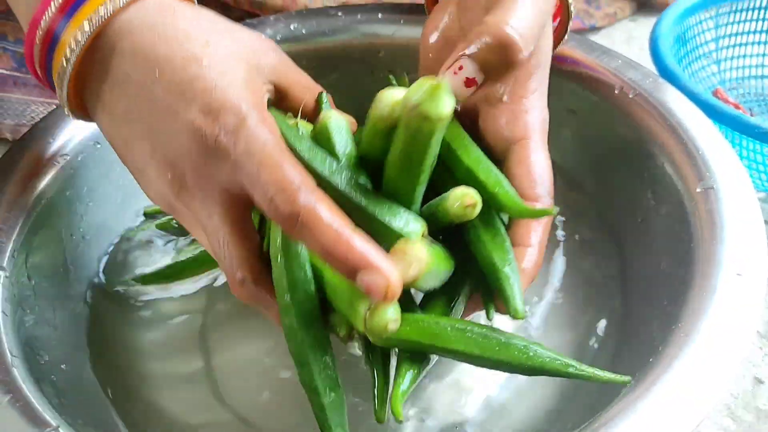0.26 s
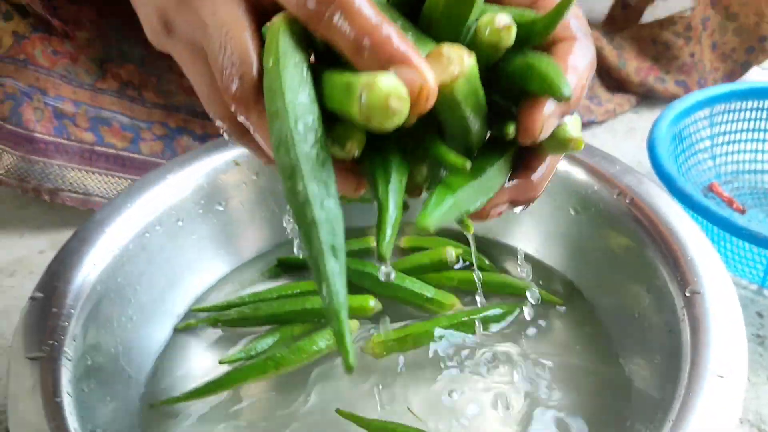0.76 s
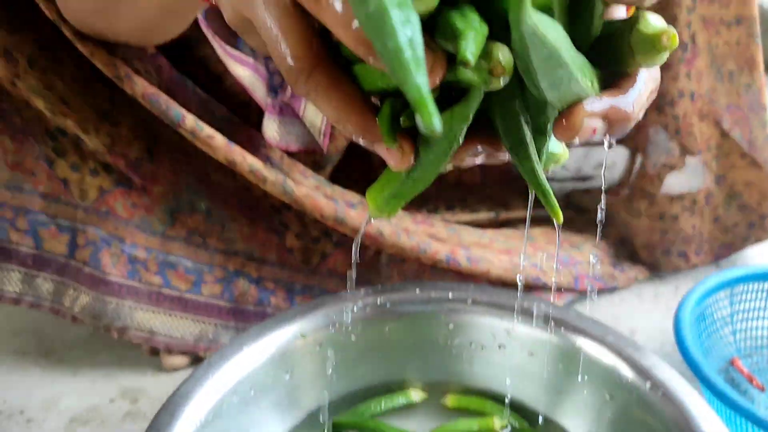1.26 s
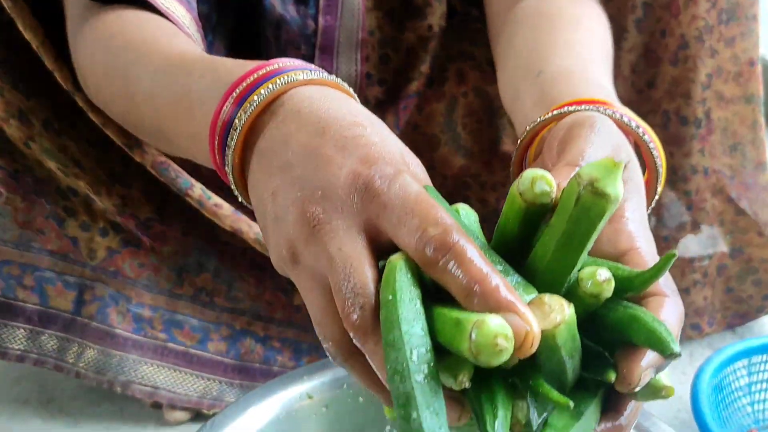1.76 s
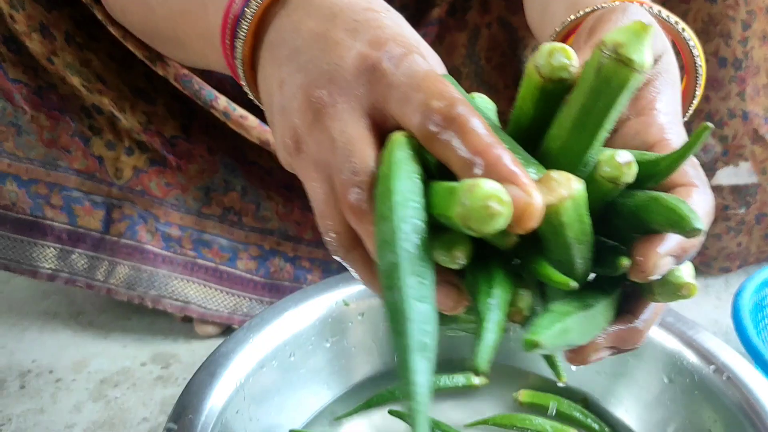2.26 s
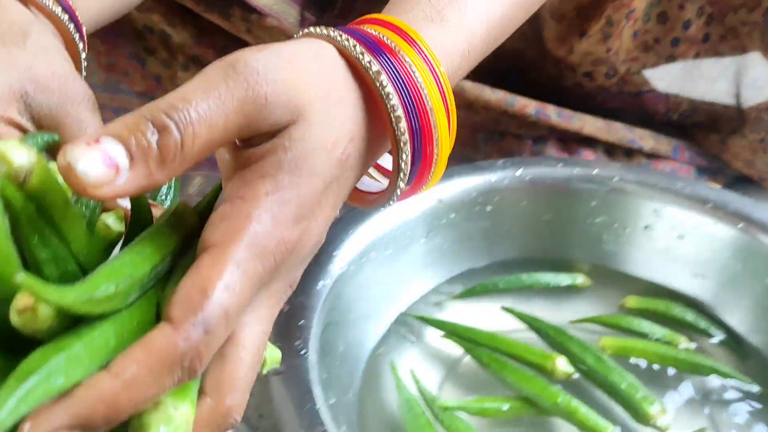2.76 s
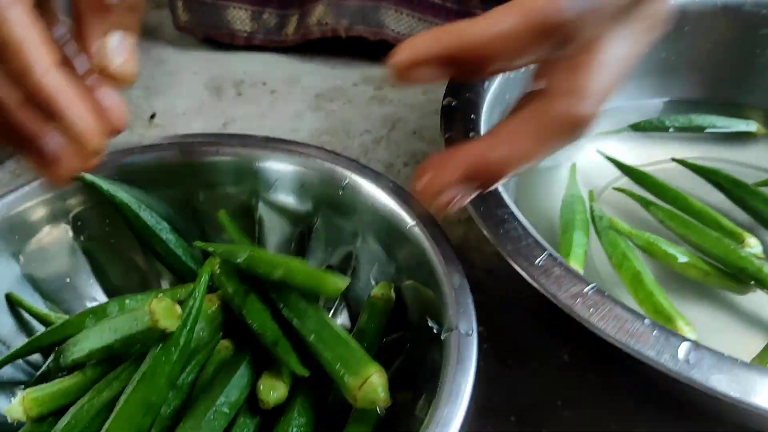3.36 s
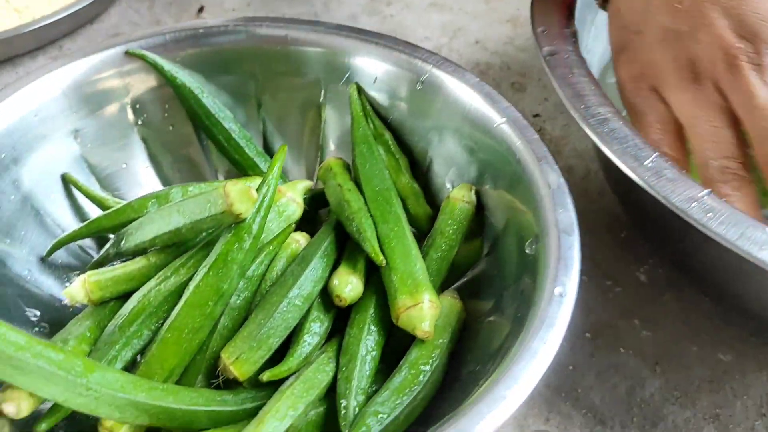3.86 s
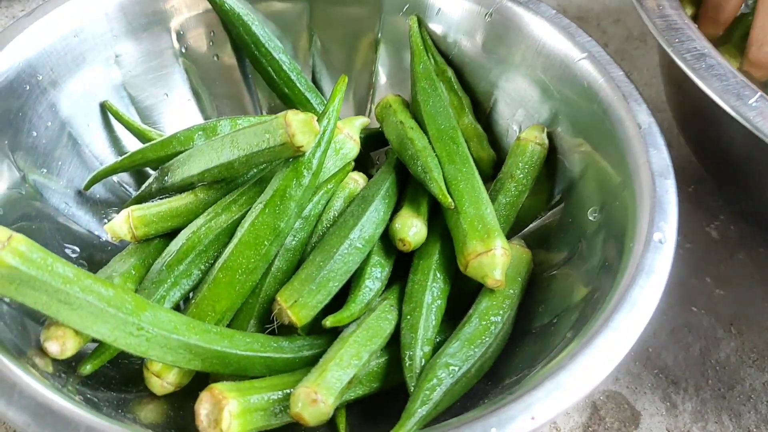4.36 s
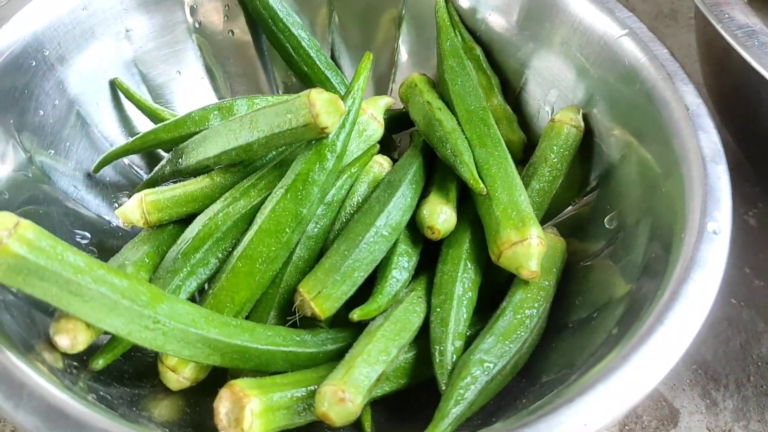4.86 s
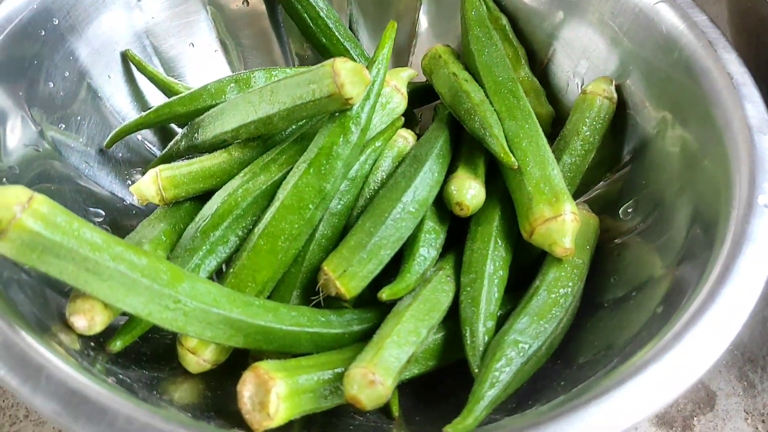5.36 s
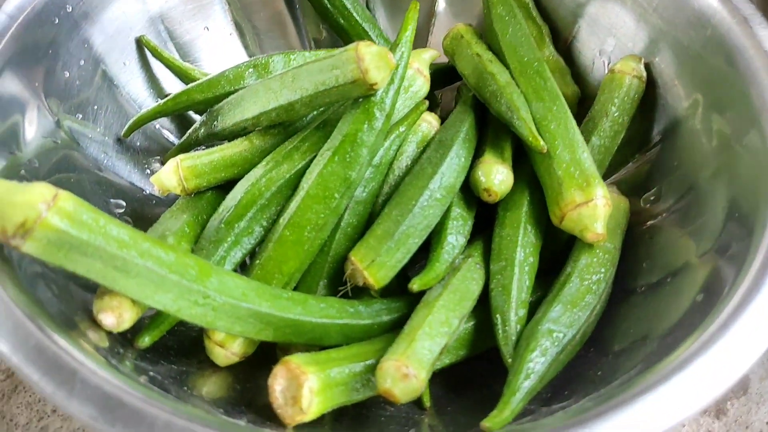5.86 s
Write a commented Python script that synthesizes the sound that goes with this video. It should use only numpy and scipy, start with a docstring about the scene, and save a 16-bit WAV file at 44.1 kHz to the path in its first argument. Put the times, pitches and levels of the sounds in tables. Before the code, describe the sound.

Wet hands lift pods from water: bright bangle ticks, dull bowl knocks, dripping and small rising bubble blips. Things thin out to faint yard noise. At about three seconds a hard, dense clatter of pods in a steel bowl dominates and settles within half a second. A dove then purrs and coos, stirred water trickles, bowl and bangles tinkle again, and wind thumps the left side. Heard very close, with short reflections outdoors.

```python
"""A yard, two microphone ports close to two steel bowls, with insects hissing and a yard wash behind throughout.
First wet hands in bangles work in the water bowl: knocks, clinks, drops, bubbles and slosh; far coos come early.
Near 2.7 s a dove coos closer; from 3 s pods crack and ring in the dry bowl, tumble and settle; more coos follow.
From 4 s puffs of wind buffet the left port; near 4.7 s and 6 s the water bowl and bangles sound again.
Steel is dying modes, drops are noise snaps and rising sines, coos are warbled sines, wind is low noise."""
import sys
import numpy as np
from scipy import signal
from scipy.fft import rfft, irfft, next_fast_len
from scipy.io import wavfile
from scipy.ndimage import uniform_filter1d

SR = 44100
rng = np.random.default_rng(int(sys.argv[2]) if len(sys.argv) > 2 else 0)


def file_out(sig):
    """Save sig as 16-bit WAV at sys.argv[1]."""
    # one column per channel
    cols = np.atleast_2d(sig).T
    # limit, then scale
    lim = np.clip(cols, -1, 1)
    pcm = np.round(lim * 32767).astype(np.int16)
    wavfile.write(sys.argv[1], SR, pcm)


N = 270326

# Pods landing in the dry bowl: start_s, level_db, favoured pitch_hz, fall_db per octave from it, choke_s after start
POD_BLOWS = [(3.015, -29.5, 261, 3, 0.015), (3.045, -14, 3770, 0.8, 0.039), (3.051, -22, 480, 45, 0.046),
             (3.061, -21, 1012, -2, 0.041), (3.055, -16, 745, 5.5, .07), (3.085, -16.5, 2780, -1, 0.022),
             (3.116, -22.5, 1350, 37, 0.026), (3.129, -28, 253, 13, 0.096), (3.159, -22, 470, 7.5, 0.024),
             (3.188, -27, 1200, 36, 0.067), (3.199, -30.5, 253, 4.5, 0.098), (3.254, -24.5, 253, 7, 0.077),
             (3.26, -42, 1071, 43, .6), (3.271, -33, 2950, 8, 0.027), (3.319, -32, 700, 11, .3),
             (3.397, -24.5, 1238, 25, .4), (3.399, -30, 400, 7, 0.056)]
# Pods tumbling and settling: time_s, level_db
POD_TUMBLE = [(3.0, -74), (3.018, -27.5), (3.036, -28.5), (3.048, -15), (3.112, -25), (3.226, -27.5),
              (3.254, -28), (3.33, -36.5), (3.44, -43.5), (3.52, -67)]
# Relative colour of the dense sheet-steel ring: pitch_hz, level_db
SHEET_STEEL = [(59, -40), (100, -25), (214, -6), (248, -9), (403, -21.5), (477, -8.5), (654, -8),
               (743, -12.5), (825, -7.5), (1040, -15), (1520, -11), (2810, 4.5), (4020, -8), (6400, -8.5),
               (7570, 0.5), (9500, -19), (15500, -29)]
# Modes of the dry bowl: pitch_hz, light_db, heavy_db under the pods, t60_s before the load stretches it
DRY_BOWL_MODES = [(259, -15.5, -12, 0.23), (480, -11.5, -32.5, 0.04), (700, -32.5, -15.5, 0.86),
                  (745, -9.5, -22.5, 0.27), (921, -37, -22, 0.3), (1018.5, -7.5, -33, .5),
                  (1071, -38, -7, 0.38), (1197, -12, -29.5, .6), (1238, -33.5, -5, 0.15),
                  (1460, -29, -14, 0.17), (1635, -31, -11.5, 0.19), (1828, -9, -29.5, 0.1),
                  (2000, -13.5, -11.5, 0.08), (2200, -15.5, -14.5, 0.45), (2217, -15.5, -17, 0.3),
                  (2300, -23, -36, 0.92), (2310, -15, -22.5, 0.22), (2700, -16.5, -31, 0.34),
                  (2934, -15.5, -17.5, 0.97), (3300, -12, -22.5, 0.11), (3520, 2, -21.5, 0.085),
                  (3800, -5, -6.5, 0.072), (3820, -8.5, -28, 0.09), (4330, -16, -27.5, 0.12),
                  (4740, -19.5, -28.5, 0.18), (5190, -20.5, -38.5, .2), (6100, -22.5, -42, 0.11),
                  (7496, -7.5, -36.5, .08), (8170, -8.5, -31.5, .08), (7200, -6, -38, 0.063)]
# The dry bowl at the two ports: pitch_hz, left_minus_right_db
DRY_BOWL_LEAN = [(60, 2), (110, -0.5), (200, 6.5), (380, 5), (700, 3), (1290, -4.5), (2380, 2.5),
                 (4400, -0.5), (8120, -10), (15000, -7.5)]
FILL_FROM_S, FILL_S = 3.06, 0.2  # the load in the bowl grows from nothing to full
RING_LIGHT, RING_FULL = .9, 1.6  # ring time as a factor, bowl empty and full
# Softer tumbling has more bass: dB of lift per dB below the hardest, up to a limit
HARDEST_DB, DULLING, DULLEST_DB = -17.5, 0.87, 22

# Knocks on the water bowl: start_s, level_db, favoured pitch_hz, fall_db per octave from it
BOWL_KNOCKS = [(.009, -49, 243, 17), (.116, -53.5, 1370, 2), (.134, -50, 3200, 11), (0.149, -64, 920, 35),
               (.339, -57.5, 2820, 14), (0.611, -52, 240, 33), (.664, -46, 921, 2.5),
               (0.666, -53, 1599, 12), (.68, -46.5, 296, 31), (2.465, -53, 240, 8), (4.664, -30, 1599, 43),
               (4.665, -39.5, 3510, 5.5), (4.721, -35.5, 2024, 35), (4.722, -41, 860, -15),
               (5.816, -51, 1294, 16.5), (6.004, -49.5, 1061, 32), (6.05, -55.5, 2299, 9)]
# Modes of the water bowl: pitch_hz, level_db, t60_s
WATER_BOWL_MODES = [(240, -2.5, 0.13), (296, -13.5, 2.5), (623, -2, 0.34), (920, -1.5, 0.35),
                    (1061, -4, 0.2), (1294, -11, 0.6), (1599, -0.5, 0.17), (2024, -3, 0.44),
                    (2299, -3, 0.41), (2476, -8, 0.19), (2820, -10, 0.35), (3200, -22, 0.16),
                    (3800, -15, 0.13), (3510, -12.5, 0.12)]
# A knock that singles out one mode thuds less: THUD_LOSS is dB per dB of fall-off
THUD_DB, THUD_LOSS, KNOCK_PAN_DB = -5, 0.33, 7.5

# Bangles clinking: start_s, level_db before panning, loudest pitch_hz, fall_db per octave from it
BANGLE_CLINKS = [(0.1171, -27.5, 4657, 4.5), (0.1295, -26.5, 7120, 20), (.1925, -36, 4900, 3),
                 (.2947, -47.5, 4540, 25), (.3351, -43, 7360, 19), (.5631, -45, 4440, 14),
                 (0.707, -47.5, 7300, 14), (4.666, -28, 6100, 10), (4.7192, -27.5, 4720, 3),
                 (4.7661, -38, 5850, 30), (6.0479, -33.5, 6260, 10)]
BANGLE_LOW_HZ, BANGLE_HIGH_HZ = 4300, 13000  # span of the many ring pitches
CLINK_T60_S = 0.058  # scaled afresh for each ring

# The microphone turns from the water bowl to the dry one: time_s, left_minus_right_db of the water bowl's treble
MICROPHONE_TURN = [(0, -3.5), (3.6, -5), (4.2, 8.5), (6.13, 9)]

# Drops bursting on water and steel: start_s, peak_db before panning, centre_hz, width as a fraction of the centre
DROP_SNAPS = [(0.245, -38, 9200, 0.21), (0.6669, -36, 6450, 0.43), (.7811, -43, 9200, .97),
              (0.987, -44, 7200, 0.13), (1.0485, -39, 7300, 0.39), (1.1655, -39, 7740, 0.17),
              (1.2116, -37.5, 9400, 0.45), (1.2337, -26.5, 4950, 1), (1.3038, -30.5, 7470, 0.21),
              (1.3202, -35, 7650, 0.24), (1.331, -36.5, 7200, 0.62), (1.3785, -35, 9500, 0.61),
              (1.415, -46, 7900, 0.44), (1.4224, -44, 7800, .6), (1.544, -36.5, 7850, .38),
              (1.5784, -35, 7340, .2), (1.659, -40.5, 8550, 0.25), (1.714, -37.5, 8150, 0.11),
              (1.779, -41, 7850, 0.3), (1.7858, -37.5, 7800, 1), (1.8208, -28.5, 7230, 0.21),
              (1.824, -33.5, 7850, .95), (2.359, -45.5, 7260, 0.11), (2.424, -53.5, 5400, 0.17),
              (3.5607, -43, 7440, 0.25), (3.631, -43.5, 2700, 0.65), (3.6335, -38, 6930, 0.3),
              (3.7304, -46.5, 8000, 0.72), (3.7672, -39, 8020, 0.2), (3.8071, -43, 6000, 0.36),
              (4.0911, -36.5, 7680, 0.14), (4.152, -49.5, 3500, 1), (4.1744, -39, 9030, .39),
              (4.21, -49, 1790, 0.91), (4.265, -45, 3810, 0.47), (5.0417, -44.5, 7240, .8),
              (5.0558, -43.5, 8170, .2), (5.5613, -41, 5700, .37), (5.778, -64, 4700, .3),
              (5.816, -45.5, 6000, .95), (5.9, -56, 8450, 0.23), (5.989, -40, 8100, .67),
              (6.0021, -37, 8600, .31), (6.0198, -36, 8000, 0.93)]
# Bubbles caught under drops: start_s, level_db before panning, starting pitch_hz, t60_s
DROP_BUBBLES = [(0.12, -28.5, 1390, .017), (.25, -55.5, 888, 0.44), (0.288, -45, 1022, 0.094),
                (.306, -38.5, 1218, 0.13), (0.37, -53, 1000, .058), (0.583, -50, 1015, 0.052),
                (.756, -42.5, 1295, 0.19), (.781, -35.5, 1615, 0.055), (0.82, -43, 2340, 0.054),
                (1.179, -47.5, 961, 0.38), (1.207, -42.5, 1099, 0.089), (1.223, -43.5, 1326, 0.083),
                (1.243, -43, 1320, 0.058), (1.264, -41, 1520, 0.043), (1.35, -47, 1950, 0.057),
                (1.358, -39.5, 1560, 0.063), (1.372, -41, 1590, 0.025), (1.422, -36.5, 1087, 0.052),
                (1.434, -35.5, 1128, .036), (1.454, -44, 998, 0.054), (1.461, -52, 967, 0.11),
                (1.465, -50, 2310, 0.047), (1.618, -51, 3000, 0.031), (1.787, -32, 1373, 0.042),
                (1.82, -28, 1473, 0.031), (1.832, -40, 1420, .036), (1.996, -56.5, 2020, .037),
                (4.604, -55, 1025, 0.068), (5.99, -51.5, 3150, 0.06), (6.006, -38, 2060, .03),
                (6.023, -34, 1920, 0.027)]
SNAP_T60_S = .015
RISE_OCT_PER_S, BUBBLE_PAN_DB = 4.39, 7
# Stray small bubbles; the level is that of the largest, above the slosh
GURGLES_PER_S, GURGLE_DB, GURGLE_T60_S = 45, 4, 0.08
GURGLE_LOW_HZ, GURGLE_HIGH_HZ = 817, 2607

# Spray and slosh round the working hands, two stretches, each of: time_s, level_db
SLOSH_STRETCHES = [
    [(0, -54.5), (.21, -55), (.4, -67.5), (.77, -57.5), (.97, -71), (1.39, -57.5), (1.57, -79), (1.8, -62),
     (2.05, -80)],
    [(3.5, -82), (3.55, -54), (3.86, -68), (4.14, -68), (4.3, -67), (4.75, -67.5), (5.18, -65), (5.67, -91),
     (5.83, -66), (5.96, -65), (6.13, -54.5)],
]
# Relative colour of the spray: pitch_hz, level_db
SPRAY_COLOUR = [(410, -71), (700, 2), (1100, 3), (1220, -12.5), (1580, -5), (3150, -9.5), (5950, -22),
                (6770, -49), (7710, -5), (10500, -37), (15500, -52.5)]

# Cooed notes, the first three from a farther bird: start_s, length_s before release, level_db before the mix,
# fade_db over the length, pitch_hz, drift_hz per second, warble_semitones before shaping, mean rolls_per_s
COO_NOTES = [(0.277, 0.1, -63, 10, 597, 303, 0.29, 20), (0.432, 0.086, -52, 2, 754, -120, 0.41, 18),
             (0.558, 0.32, -54.5, -6.5, 671.6, -25, 0.73, 16.5),
             (2.678, 0.049, -49, 11.5, 505, 195, .9, 27), (2.76, 0.085, -47, -10, 529.6, -48, 1, 33),
             (3.522, 0.13, -40, 2, 553.7, -35, 1.3, 30), (3.672, 0.15, -38.5, 0, 649, -26.5, 2.35, 28.3),
             (3.797, 0.012, -31, 0, 630, -24, 0.39, 19.5), (3.865, 0.0092, -29, -1.5, 634, -40, 1.7, 36),
             (3.921, 0.015, -29.5, -1, 624, -28, 1.14, 26.5),
             (3.976, 0.3, -38, -4.5, 624.5, -97, 2.26, 24.3), (4.308, 0.1, -42, -21, 590, -200, 0.83, 25.6),
             (4.574, 0.092, -58.5, 22.5, 495, 452, 1.5, 31.4),
             (4.704, 0.22, -37, -1, 642.4, 30.5, 2.34, 27.8),
             (4.938, 0.35, -37, -3.5, 661.7, -130, 1.17, 19.5)]
COO_ATTACK_S, COO_RELEASE_S, DOVE_PAN_DB = 0.005, 0.038, 8
SCOOP_SEMITONES, SCOOP_S, FLUTTER_DB = -.5, .025, 1.64

# Deep buffeting of the breeze: time_s, level_db before panning
BREEZE_LEVEL = [(0, -76.5), (3.9, -74), (4.5, -63), (5.3, -66.5), (5.55, -70.5), (6.13, -59.5)]
# Puffs on the left port: centre_s, level_db, length_s
WIND_PUFFS = [(4.04, -56, 0.051), (4.373, -63, 0.046), (4.46, -53.5, 0.056), (4.597, -52, 0.05),
              (4.734, -43, 0.18), (4.985, -44, 0.065), (5.044, -52, 0.055), (5.21, -43, 0.069),
              (5.315, -46.5, .07), (5.416, -51, 0.082), (5.685, -40.5, 0.045), (5.841, -35, 0.059),
              (5.96, -55, 0.088), (6.051, -32, 0.046)]
# The edge is noise above the deep buffeting; shelter is the level of the puffs at the right port
BREEZE_PAN_DB, BREEZE_EDGE_DB, PUFF_SHELTER_DB, PUFF_EDGE_DB = 10.5, 3.5, -48, -10

# Relative colour of the yard's wash: pitch_hz, level_db
YARD_COLOUR = [(20, -3.5), (47, -12.5), (112, -4), (207, -6.5), (250, -1.5), (324, -12), (416, -12),
               (597, -11.5), (789, -16), (1500, -25.5), (4800, -31.5), (6500, -30), (7600, -17),
               (9300, -35.5), (10300, -42), (15600, -58)]
# Left-right likeness of the yard: pitch_hz, likeness (1 is identical)
YARD_LIKENESS = [(60, 1), (180, 1), (550, 0.26), (1650, -0.09), (4970, -0.081), (15000, 0.76)]
# Lean of the yard: pitch_hz, left_minus_right_db
YARD_LEAN = [(60, -0.5), (180, 5), (550, 4.5), (1650, 4.5), (4970, -0.5), (15000, -10)]
YARD_DB, INSECT_DB = -59, -72  # insects before their throb

# The microphone ports lose the top: pitch_hz, level_db
PORT_COLOUR = [(20, 0), (9300, 2), (9900, -6.5), (15600, -13)]
CEILING = .85  # the loudest peaks round off towards this
EDGE_HZ = 15650  # band limit


def dry_bowl():
    """Single blows crack, then ring the modes until choked; the tumbling heap rattles the whole sheet."""
    out = np.zeros((2, N))
    mode_hz, light_db, heavy_db, t60 = np.transpose(DRY_BOWL_MODES)
    for s, db, hz, fall_db, choke_s in POD_BLOWS:
        t = np.arange(round((choke_s + .08) * SR)) / SR
        loaded = np.clip((s - FILL_FROM_S) / FILL_S, 0, 1)
        mode_db = light_db + loaded * (heavy_db - light_db)
        mode_t60 = t60 * (RING_LIGHT + loaded * (RING_FULL - RING_LIGHT))
        modes = np.c_[mode_hz, mode_db, mode_t60]
        sound = ring(modes, -fall_db * abs(octaves(modes, hz)), 0.000512, 22, len(t) / SR)
        crack = evened(coloured(rng.standard_normal((2, 3000)), SHEET_STEEL))
        crack = crack * amp(-60 * t[:3000] / 0.027)
        add(sound, 0, amp(-6 - 0.3 * fall_db) * crack)  # the less one pitch is favoured, the louder the crack
        choke = amp(-900 * np.maximum(t - choke_s, 0))
        add(out, s, amp(db) * choke * sound)
    gate, level_db = follow(POD_TUMBLE)
    rattle = patter(450, 3.4, SHEET_STEEL, .08, 4.5, count=12)(gate * amp(level_db))
    bass = signal.sosfilt(signal.butter(2, 1100, fs=SR, output="sos"), rattle)
    bass_db = np.minimum(DULLING * (HARDEST_DB - level_db), DULLEST_DB)
    out += rattle + (amp(bass_db) - 1) * bass
    leans = [np.multiply(DRY_BOWL_LEAN, [1, half]) for half in (.5, -.5)]
    out = np.array([coloured(port, lean) for port, lean in zip(out, leans)])
    too_deep = signal.butter(2, 110, "high", fs=SR, output="sos")  # too small to radiate deep bass
    return signal.sosfilt(too_deep, out)


def water_bowl():
    """Knuckles and pods knock the wall: a dull thud of noise, then the modes nearest the favoured pitch."""
    out, t = np.zeros((2, N)), np.arange(SR // 5) / SR
    for s, db, hz, fall_db in BOWL_KNOCKS:
        weight_db = -fall_db * abs(octaves(WATER_BOWL_MODES, hz))
        sound = ring(WATER_BOWL_MODES, weight_db, 0.00033, 23, 1.2 if hz < 320 else .5)
        thud = evened(resonate(rng.standard_normal((2, len(t))), hz, 0.43 * hz + 300))
        add(sound, 0, thud * amp(THUD_DB - THUD_LOSS * fall_db - 60 * t / 0.17))
        add(out, s, amp(db) * sides(KNOCK_PAN_DB)[:, None] * sound)
    return out


def bangles():
    """A stack of thin rings: one pitch stands out of a crowd that is new at every clink."""
    out = np.zeros((2, N))
    for s, db, hz, fall_db in BANGLE_CLINKS:
        where, size, lasting = rng.random((3, 80))
        crowd_hz = BANGLE_LOW_HZ * (BANGLE_HIGH_HZ / BANGLE_LOW_HZ) ** where
        crowd = np.c_[crowd_hz, -12 * size, CLINK_T60_S * (.4 + 1.3 * lasting)]
        modes = np.vstack([crowd, (hz, 4, 0.97 * CLINK_T60_S)])
        sound = ring(modes, -fall_db * abs(octaves(modes, hz)), 0.000633, 260, 0.25)
        add(out, s, amp(db) * facing(s) * sound)
    return out


def drops():
    """A burst is a snap of noise in a band; a bubble is a wobbling sine that at first rises as it dies."""
    out, t = np.zeros((2, N)), np.arange(SR // 5) / SR
    for s, db, hz, width in DROP_SNAPS:
        snap = rng.standard_normal((2, 2000)) * amp(-60 * t[:2000] / SNAP_T60_S)
        snap = snap + 0.091 * snap[::-1]  # a little of each port in the other
        snap = resonate(resonate(snap, hz, hz * width), hz, hz * width)
        add(out, s, amp(db) * facing(s) * snap / abs(snap).max())
    for s, db, hz, t60 in [*DROP_BUBBLES, *gurgles()]:
        wobble = evened(uniform_filter1d(rng.standard_normal(len(t)), size=150))
        rise = RISE_OCT_PER_S * np.minimum(t, .05)
        phase = 2 * np.pi * np.cumsum(hz * 2 ** (rise + 0.055 * wobble)) / SR
        body = amp(db - 60 * t / max(t60, .01)) * np.minimum(t / 0.0016, 1)
        ports = np.sin([phase, phase - 2 * np.pi * hz * 0.00031])  # right port lags
        add(out, s, sides(BUBBLE_PAN_DB)[:, None] * body * ports)
    return out


def gurgles():
    """Small bubbles at random times, louder where the water is stirred; rows as in DROP_BUBBLES."""
    when, high, size = rng.random((round(GURGLES_PER_S * N / SR), 3)).T
    s = when * (N - 1) / SR
    stirred = slosh_level()[(s * SR).astype(int)]
    db = 20 * np.log10(stirred + 1e-9) + GURGLE_DB - 12 * size
    hz = GURGLE_LOW_HZ * (GURGLE_HIGH_HZ / GURGLE_LOW_HZ) ** high
    return np.c_[s, db, hz, GURGLE_T60_S * np.ones(len(s))][db > -90]


def slosh():
    """Countless small drops, each a short fizz."""
    return patter(1200, 3.5, SPRAY_COLOUR, .04, 3.5)(slosh_level())


def slosh_level():
    """Gain of the stirred water at every sample."""
    return sum(gate * amp(db) for gate, db in map(follow, SLOSH_STRETCHES))


def dove():
    """Near sines that roll unevenly: each roll swells and its pitch climbs and falls."""
    out = np.zeros((1, N))
    wander = evened(uniform_filter1d(uniform_filter1d(rng.standard_normal(N), 1500), 1500))
    flutter = evened(uniform_filter1d(uniform_filter1d(rng.standard_normal(N), 500), 500))
    for s, length, db, fade_db, hz, drift, depth, per_s in COO_NOTES:
        t = np.arange(round((length + COO_RELEASE_S) * SR)) / SR
        uneven = 1 + 0.45 * np.roll(wander, -round(s * SR))[:len(t)]
        roll = 2 * np.pi * np.cumsum(per_s * uneven) / SR
        climb = np.tanh(0.86 * np.sin(roll)) - .3 * np.sin(2 * roll)  # a rounded, skewed warble
        semitones = depth * climb + SCOOP_SEMITONES * np.exp(-t / SCOOP_S)
        tone = np.sin(2 * np.pi * np.cumsum((hz + drift * t) * 2 ** (semitones / 12)) / SR)
        shape = np.clip(np.minimum(t / COO_ATTACK_S, (t[-1] - t) / COO_RELEASE_S), 0, 1)
        shape = shape * amp(db + fade_db * t / length)
        swell = 1 + 0.083 * depth * np.cos(roll + 0.59)
        add(out, s, (shape * tone * swell)[None])
    ports = [np.roll(out[0], 16), out[0]]  # the bird sits to one side
    return sides(DOVE_PAN_DB)[:, None] * amp(FLUTTER_DB * flutter) * ports


def wind():
    """Lumpy low turbulence, unrelated at the two ports; the puffs hardly reach the right one."""
    t = np.arange(N) / SR
    deep_colour = [(8, -35.0), (25, -0.5), (50, -1.5), (90, -24.0), (300, -75.5)]  # pitch_hz, level_db
    edge_colour = [(30, -41.5), (65, -0.5), (150, -13), (300, -17.0), (900, -69)]
    deep = evened(coloured(rng.standard_normal((2, N)), deep_colour))
    edge = evened(coloured(rng.standard_normal((2, N)), edge_colour))
    puffs = sum(amp(db) * np.exp(-(2 * (t - s) / length) ** 2) for s, db, length in WIND_PUFFS)
    breeze = amp(follow(BREEZE_LEVEL)[1]) * sides(BREEZE_PAN_DB)[:, None]
    breeze = breeze * (deep + amp(BREEZE_EDGE_DB) * edge)
    return breeze + puffs * amp([[0], [PUFF_SHELTER_DB]]) * (deep + amp(PUFF_EDGE_DB) * edge)


def yard():
    """Distant wash of noise with drifting patches, and a throbbing band of insects."""
    frames, hz = N // 256 + 5, np.fft.rfftfreq(1024, 1 / SR)
    a, b, c, d, patches = rng.standard_normal((frames, 513, 5)).T
    patches = evened(uniform_filter1d(uniform_filter1d(patches, 10, 0), 12, 1))
    same = np.clip(read(YARD_LIKENESS, hz), -1, 1)[:, None]
    left = a + 1j * b
    right = same * left + np.sqrt(1 - same ** 2) * (c + 1j * d)
    level = amp(read(YARD_COLOUR, hz)[:, None] + 0.88 * patches)
    spectra = np.array([left, right]) * level * sides(read(YARD_LEAN, hz))[:, :, None]
    wash = amp(YARD_DB) * evened(signal.istft(spectra, nperseg=1024, noverlap=768)[1][:, :N])
    throb = 1 + .6 * np.sin(2 * np.pi * (11 * np.arange(N) / SR + 0.17))  # 11 a second
    chirr = resonate(resonate(rng.standard_normal((2, N)), 7550, 470), 7550, 470)
    return wash + amp(INSECT_DB) * evened(chirr) * throb


def room(x, t60, count=SR // 2):
    """Reflections as sparse taps of random sign dying away, other taps at each port."""
    taps = np.zeros((2, count))
    at = np.arange(200, count - 20, 20) + rng.integers(0, 20, (2, (count - 201) // 20))
    np.put_along_axis(taps, at, rng.choice([-1., 1.], at.shape), 1)
    taps *= amp(-60 * np.arange(count) / SR / t60)
    return signal.fftconvolve(x.mean(0)[None], taps / np.linalg.norm(taps[0]), axes=1)[:, :N]


def close_ports(x, hz):
    """Long waves reach the two ports nearly alike: below hz the channels draw together."""
    side = signal.sosfiltfilt(signal.butter(1, hz, fs=SR, output="sos"), x[0] - x[1]) / 2
    return x - .75 * np.array([side, -side])


def facing(s):
    """Left and right gains of the water bowl's treble at time s."""
    return sides(np.interp(s, *np.transpose(MICROPHONE_TURN)))[:, None]


def ring(modes, weight_db, apart_s, beat_hz, seconds):
    """Dying modes, peak near 1; each beats, and reaches the two ports at its own small delay."""
    hz, db, t60 = np.transpose(modes)[:, :, None]
    t = np.arange(round(seconds * SR)) / SR
    start, lag, split = rng.random((3, len(modes), 1))
    size = amp(db + weight_db[:, None])
    delays = [side * apart_s * (lag - .5) for side in (1, -1)]
    waves = [np.sin(2 * np.pi * (hz * (t + delay) + start)) for delay in delays]
    beat = 1 + 0.12 * np.cos(2 * np.pi * beat_hz * (.5 + split) * t)
    shape = amp(-60 * t / np.clip(t60, .01, 1.8)) * beat
    onset = np.minimum(t / 0.0011, 1)
    return np.sum(shape * size * waves, axis=1) * onset / np.sqrt(np.sum(size ** 2))


def patter(per_s, spread_db, points, t60, patchy_db, count=8):
    """Dense random taps, rms 1 at gain 1; each falls on one of several spots with its own short, uneven ring."""
    taps = amp(spread_db * np.minimum(rng.exponential(1, N), 4)) * (rng.random(N) < per_s / SR)
    spot, t = rng.integers(0, count, N), np.arange(round(t60 * SR)) / SR
    bursts = rng.standard_normal((count, 2, len(t))) * amp(-60 * t / t60)
    bursts = coloured(np.pad(bursts, ((0, 0), (0, 0), (0, 400))), points)
    spot_hz = np.geomspace(200, 12000, 14)
    bursts = [coloured(b, np.c_[spot_hz, patchy_db * rng.standard_normal(14)]) for b in bursts]
    scale = np.sqrt(np.mean(taps ** 2) * np.mean(np.sum(np.square(bursts), axis=2)))

    def play(gain):
        """The taps at a gain that varies in time."""
        hits = [(taps * gain * (spot == k))[None] for k in range(count)]
        return sum(signal.oaconvolve(hit, b)[:, :N] for hit, b in zip(hits, bursts)) / scale
    return play


def resonate(x, hz, width_hz):
    """Shifts hz down to zero, smooths, shifts back: a resonance of gain 1."""
    turn = np.exp(2j * np.pi * np.cumsum(hz * np.ones(x.shape[-1])) / SR)
    r = np.exp(-np.pi * width_hz / SR)
    return 2 * (turn * signal.lfilter([1 - r], [1, -r], x / turn)).real


def coloured(x, points):
    """Filters x by the spectrum in points."""
    size = next_fast_len(x.shape[-1])
    gain = amp(read(points, np.fft.rfftfreq(size, 1 / SR)))
    return irfft(rfft(x, size) * gain, size)[..., :x.shape[-1]]


def read(points, hz):
    """Reads a spectrum on a log-frequency axis."""
    f, value = np.transpose(points)
    return np.interp(np.log(hz + 1), np.log(f + 1), value)


def octaves(modes, hz):
    """Distance of each mode from hz."""
    return np.log2(np.transpose(modes)[0] / hz)


def follow(rows):
    """A soft-edged gate that is 1 inside the span, then the columns of a curve at every sample."""
    s, *columns = np.transpose(rows)
    t = np.arange(N) / SR
    gate = uniform_filter1d(1. * ((t >= s[0]) & (t <= s[-1])), size=400)
    return [gate] + [np.interp(t, s, c) for c in columns]


def add(mix, s, sound):
    """Mixes a sound in at time s."""
    part = mix[:, round(s * SR):][:, :sound.shape[1]]
    part += sound[:, :part.shape[1]]


def sides(pan_db):
    """Left and right gains for a level difference."""
    return amp(np.multiply.outer([.5, -.5], pan_db))


def evened(x):
    """Scales to rms 1."""
    return x / np.sqrt(np.mean(x ** 2) + 1e-20)


def amp(db):
    """Decibels to gain."""
    return 10 ** (np.asarray(db) / 20)


def scene():
    """Near sources with some of the walls, a wetter dove, then the yard and wind."""
    steel, drips, bird = dry_bowl() + water_bowl() + bangles(), drops(), dove()
    near = steel + amp(-1.5) * room(steel, 0.33)
    near = near + drips + amp(-2.5) * room(drips, 0.27) + slosh()
    perch = amp(-2.5) * bird + amp(-0.5) * room(bird, 0.32)
    return close_ports(near + perch, 500) + yard() + wind()


def record(dry):
    """The colour of the ports, soft clipping, then the band limit."""
    clipped = CEILING * np.tanh(coloured(dry, PORT_COLOUR) / CEILING)
    band = signal.firwin(511, EDGE_HZ, window=("kaiser", 9), fs=SR)
    return signal.oaconvolve(clipped, band[None], "same")


dry = scene()
out = record(dry)
file_out(out)
```